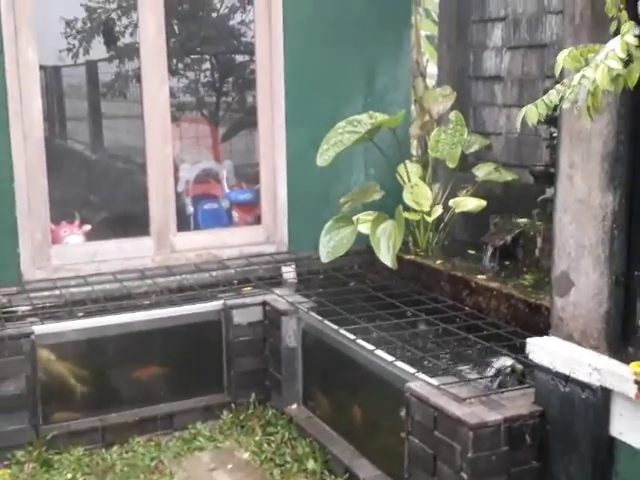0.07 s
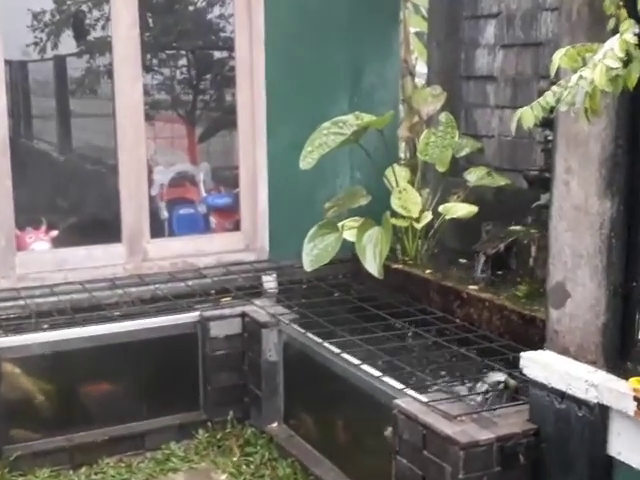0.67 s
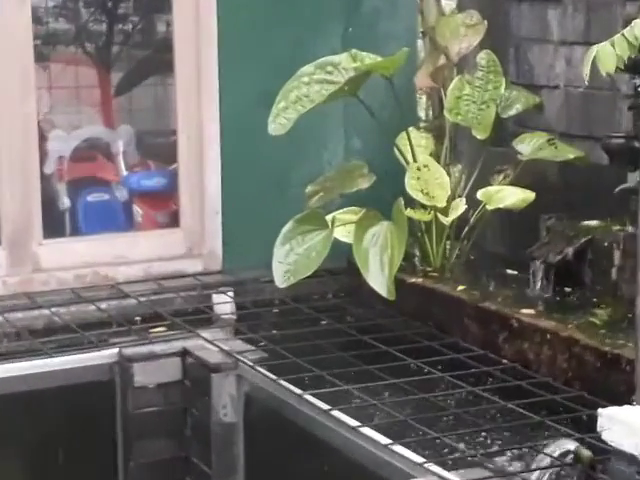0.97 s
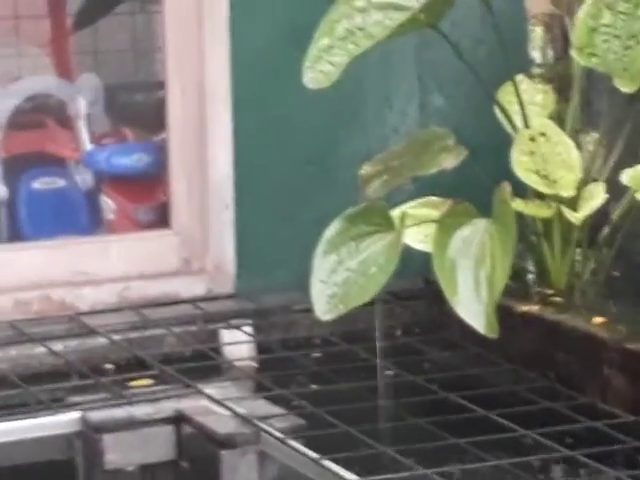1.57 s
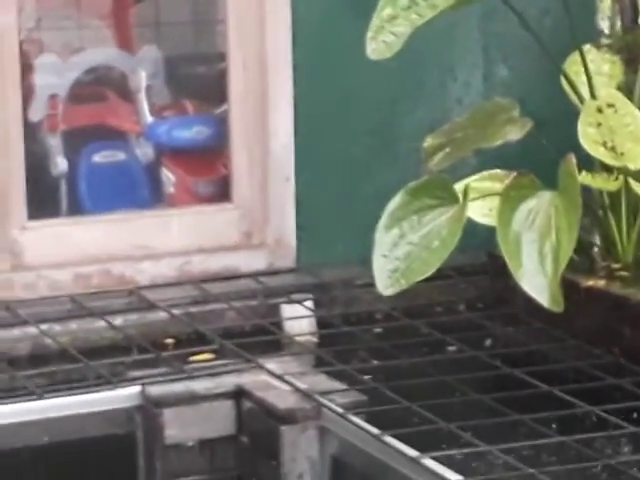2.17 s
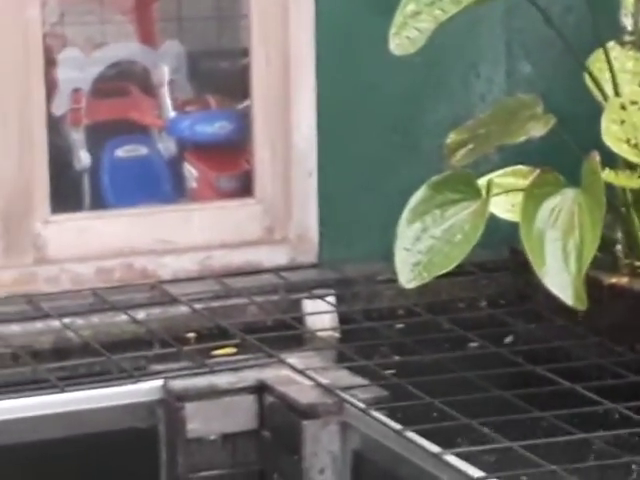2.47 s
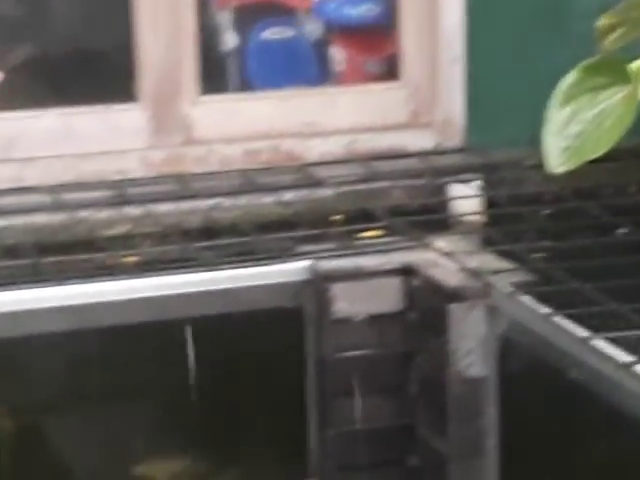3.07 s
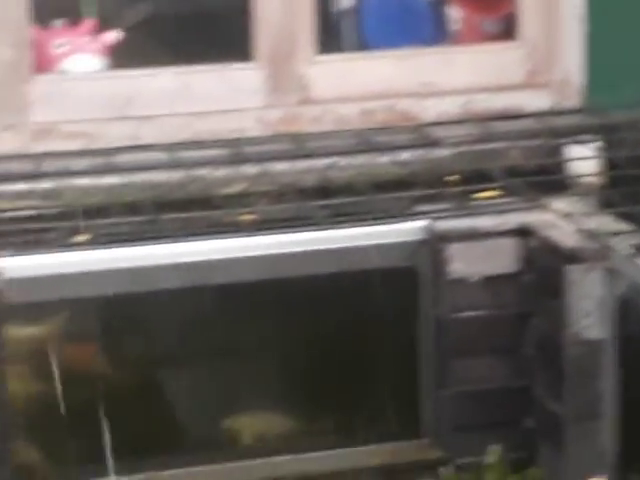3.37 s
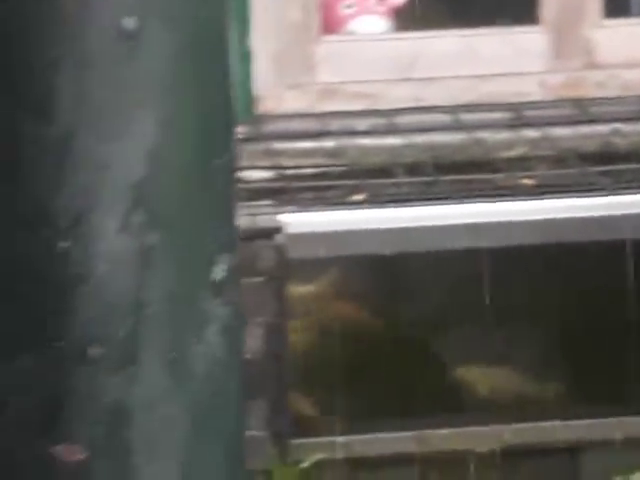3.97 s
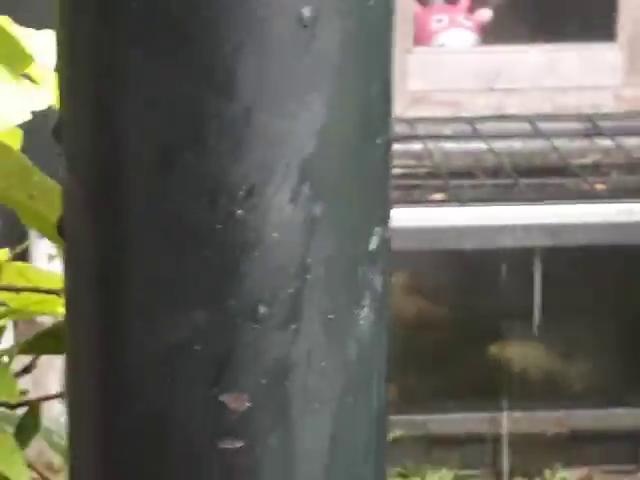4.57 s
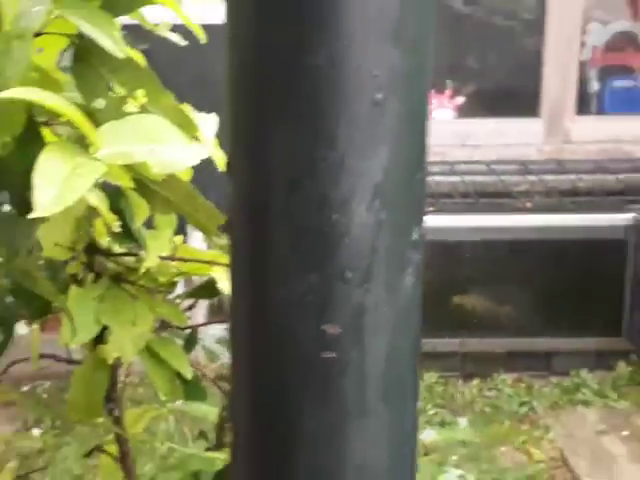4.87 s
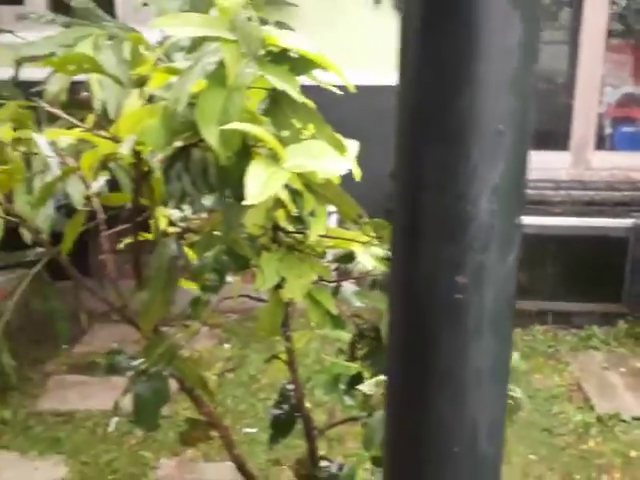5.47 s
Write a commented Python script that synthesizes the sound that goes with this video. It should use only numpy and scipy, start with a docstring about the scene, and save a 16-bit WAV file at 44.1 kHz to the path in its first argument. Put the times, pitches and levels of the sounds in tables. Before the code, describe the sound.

Rain patters thickly and continuously on plants, paving and pond water in a small garden, with a fine fizz of splashes on top. Now and then a heavy drop lands nearby with a crisp tick. Around halfway a faint rumble briefly rises, and the rain then softens a touch before partly recovering. One microphone hears it all, with the deepest and highest sounds dulled.

```python
"""Dense, steady rain patters on leaves, paving and a fish pond in a small walled garden.
Each drop is a tiny burst of tone. Countless far ones merge into a wash, splashes throw up a fizzing
spray, and single big drops tick close by. A soft rumble lies underneath and swells once near the middle.
One microphone hears it all and dulls the deepest and highest sounds."""
import sys
import numpy as np
from scipy.fft import rfft, irfft, next_fast_len
from scipy.io import wavfile
from scipy.ndimage import uniform_filter1d, minimum_filter1d, map_coordinates

SR = 44100
rng = np.random.default_rng(int(sys.argv[2]) if len(sys.argv) > 2 else 0)


def wrap_up_sound(samples):
    """Save the sound to the file named by the first command line argument, as 16-bit audio."""
    columns = np.atleast_2d(samples).T
    # keep every value between -1 and 1, then stretch to whole-number steps
    tamed = np.clip(columns, -1, 1)
    steps = np.round(tamed * 32767).astype(np.int16)
    wavfile.write(sys.argv[1], SR, steps)


N = 248283

# How strong a splash is from low to high pitch. Columns: pitch_hz, level_db
SPLASH_TONE = [(800, -33.5), (1800, -10.5), (2600, -5.5), (3300, -1.5), (3700, 0), (4300, 0), (4800, -4.5),
               (6000, -7), (9000, -10), (15000, -16)]


def amp(db):
    """Turn decibels into a number to multiply a sound by."""
    return 10 ** (np.asarray(db) / 20)


def unit(x):
    """Scale a sound so that its average strength (rms) is 1."""
    return x / np.sqrt(np.mean(x ** 2) + 1e-20)


def curves(rows):
    """Join a table's points with straight lines: one curve for each column after the time."""
    time_s, *columns = np.transpose(rows)
    return [np.interp(np.arange(N) / SR, time_s, column) for column in columns]


def wobble(rate_hz):
    """A smooth curve through rate_hz random values a second."""
    return map_coordinates(rng.standard_normal(2000), [np.arange(N) * rate_hz / SR], mode="wrap")


def coloured(x, tone):
    """Make each pitch louder or softer, following rows of (pitch_hz, level_db)."""
    size = next_fast_len(N + 8192, real=True)
    pitch_hz, level_db = np.transpose(tone)
    all_hz = np.fft.rfftfreq(size, 1 / SR)
    gain = amp(np.interp(np.log(all_hz + 1), np.log(pitch_hz), level_db))
    # these steps make the filter ring only after a hit, never before it
    cepstrum = irfft(np.log(gain), size)
    cepstrum[1:size // 2] *= 2
    cepstrum[size // 2 + 1:] = 0
    return irfft(rfft(x, size) * np.exp(rfft(cepstrum)), size)[:N]


def rush(tone):
    """Steady noise: too many hits to tell apart."""
    return unit(coloured(rng.standard_normal(N), tone))


def placed(start_s, sounds):
    """Add up short sounds, one a row, each starting at its own time."""
    at = np.round(np.abs(start_s) * SR).astype(int)[:, None] + np.arange(sounds.shape[1])
    return np.bincount(at.ravel(), sounds.ravel(), N)[:N]


def crackles(count, fade_s):
    """Short bursts of noise, equal in energy, that fall by 60 dB in fade_s."""
    t = np.arange(SR // 10) / SR
    bursts = rng.standard_normal((count, len(t))) * amp(-60 * t / fade_s)
    return bursts / np.linalg.norm(bursts, axis=1, keepdims=True)


def impacts(start_s, level_db, pitch_hz, rise_s, rough):
    """Each drop is a tone that swells and dies within milliseconds; splashing roughens it."""
    t = np.arange(SR // 100) / SR
    age = t / np.maximum(rise_s, 1 / SR)[:, None]  # 1 at the loudest moment
    loudness = amp(level_db)[:, None] * age * np.exp(1 - age)
    drift = np.cumsum(rng.standard_normal(age.shape), axis=1) * rough
    return placed(start_s, loudness * np.sin(2 * np.pi * pitch_hz[:, None] * t + drift))


def shower(count, centre_hz, scatter, cycles, spread_db):
    """Drops at random moments: many small ones, few large, each with its own pitch."""
    when, smallness, pitch, life = rng.random((count, 4)).T
    pitch_hz = centre_hz * np.exp(scatter * np.log(pitch / (1 - pitch)))
    pitch_hz = np.clip(pitch_hz, 200, SR / 3)
    level_db = -spread_db * np.log(smallness + .02)
    rise_s = cycles * (life + .5) / pitch_hz
    return unit(impacts(when * N / SR, level_db, pitch_hz, rise_s, rough=0.073))


def rumble():
    """A soft, wavering low roar under the rain that swells once."""
    # The deep tone of the roar. Columns: pitch_hz, level_db
    rumble_tone = [(25, -34), (45, -22), (62, -11.5), (78, -12), (100, -0.5), (125, -1), (170, 2.5),
                   (260, -2), (450, -6.5), (1000, -47.5)]
    rest_db, swell_db = -41.5, 9
    start_s, rise_s, hold_s, fall_s = 2.5, 0.4, 0.48, 0.54
    corners_s = np.cumsum([start_s, rise_s, hold_s, fall_s])
    swell = np.interp(np.arange(N) / SR, corners_s, [0, 1, 1, 0])
    return amp(rest_db + swell_db * swell + 1.9 * wobble(7)) * rush(rumble_tone)


def far_rain(wash_db):
    """Rain on lawn and roofs all around, with dull plops from the pond."""
    # The tone of countless far drops blended together. Columns: pitch_hz, level_db
    wash_tone = [(60, -47.5), (140, -17.5), (200, -3.5), (330, -0.5), (480, -0.5), (760, 0.54), (950, 0),
                 (1300, 0.5), (1900, -1.5), (3000, -3), (4500, -2.5), (7000, -18), (15000, -18)]
    hush = rush(wash_tone) * amp(0.46 * wobble(14))
    plops = shower(count=2200, centre_hz=983, scatter=0.271, cycles=1.57, spread_db=5)
    return amp(wash_db + 3.5) * hush + amp(wash_db - 11.5) * plops


def spray(spray_db):
    """Tiny droplets thrown up by splashes make a high fizz; the nearest spatter one by one."""
    # The thin hiss of the droplets. Columns: pitch_hz, level_db
    spray_tone = [(3000, -22), (6000, -7.5), (9000, 0), (12000, 2.5), (15500, 0)]
    fizz = shower(count=3000, centre_hz=10900, scatter=0.11, cycles=1.0, spread_db=3.5)
    spatter = shower(count=90, centre_hz=10500, scatter=0.12, cycles=1.3, spread_db=3.5)
    loudness = amp(spray_db + 23.5 + 0.73 * wobble(10))
    return loudness * (rush(spray_tone) + amp(-10) * fizz + amp(-13) * spatter)


def big_drops(start_s, ring_db, pitch_hz, snap_db):
    """A big drop snaps as it lands, rings for an instant, rebounds and scatters a little splash."""
    # The bright tone of the snap. Columns: pitch_hz, level_db
    snap_tone = [(600, -31), (1500, -16), (2300, 7.5), (6000, 1.5), (9000, 1), (15000, -8)]
    count = len(start_s)
    rise_s = 1.36 / pitch_hz  # the ring is loudest after 1.36 vibrations
    ring = impacts(start_s, ring_db - 3.5, pitch_hz, rise_s, rough=0.027)
    # water thrown off by the blow strikes again within a few milliseconds
    wait_s = 0.001066 + 0.0018 * rng.random(count)
    rebound = impacts(start_s + wait_s, ring_db - 8.0, pitch_hz, rise_s, rough=0.07)
    snaps = placed(start_s, amp(snap_db - 4.0)[:, None] * crackles(count, fade_s=0.0047))
    splashes = placed(start_s, amp(ring_db + 15.0)[:, None] * crackles(count, fade_s=0.13))
    return ring + rebound + coloured(snaps, snap_tone) + coloured(splashes, SPLASH_TONE)


def stray_drops(count):
    """Big drops a little further off fall at random, each with its own size, pitch and hardness."""
    centre_hz, scatter_octaves, range_db = 4030, 0.37, 7.5
    when, smallness, softness = rng.random((count, 3)).T
    pitch_hz = centre_hz * 2 ** (scatter_octaves * rng.standard_normal(count))
    ring_db = -8.5 - range_db * smallness
    snap_db = 6 - range_db * (smallness + softness)
    return big_drops(when * N / SR, ring_db, pitch_hz, snap_db)


def close_drops():
    """The few big drops that land nearest tick well above the rain."""
    # One drop a row; levels are relative. Columns: start_s, ring_db, pitch_hz, snap_db
    ticks = [(0.078, -1, 4570, 7), (0.1555, 1, 4600, -4), (0.213, -6.5, 3940, 2), (1.2408, -6, 4300, 0),
             (1.253, -7, 5200, 5), (1.3847, 0, 3900, 1), (1.405, -3, 3800, 6), (2.748, -4, 3450, -4),
             (2.8842, -3.5, 4100, -2), (3.237, 4, 3900, 10), (3.3417, -3, 4060, 4), (3.5, -8.5, 3440, 0),
             (3.785, -8, 4200, 11), (3.7963, -7.5, 3480, 0), (3.9971, -8, 4400, 9.5),
             (4.2299, -4.5, 3750, 1), (4.5153, -5, 3250, -2), (4.5912, -1.5, 3100, 5),
             (4.6444, -3, 3050, -1), (4.9817, -1.5, 4700, 14), (5.1013, -7, 3100, 4),
             (5.175, -4.5, 4400, 13), (5.4492, -5, 2900, 10)]
    return big_drops(*np.transpose(ticks))


def patter(patter_db):
    """Drops on leaves, paving and water: a dense sizzle, and nearer drops that stand out of it."""
    sizzle = rush(SPLASH_TONE) * amp(1.04 * wobble(22.08))
    dense = shower(count=5000, centre_hz=3913, scatter=0.1256, cycles=1.3, spread_db=2.5)
    near = shower(count=520, centre_hz=4000, scatter=0.128, cycles=1.17, spread_db=1.0)
    flurry = amp(patter_db + 0.63 * wobble(8.3))
    return flurry * (amp(-2.5) * sizzle + amp(-6.0) * dense + amp(-11.0) * near)


def scene():
    """All of the rain reaches one microphone, so left and right are the same."""
    # The rain builds slowly, eases all at once, then recovers a little; levels are relative.
    # Columns: time_s, wash_db, patter_db, spray_db
    rain_levels = [(0, -27, -24, -49.5), (0.9, -27.5, -23, -50.5), (1.3, -26, -23, -49),
                   (2.35, -27.5, -22.5, -49), (2.85, -26, -22, -47.5), (3.32, -27, -21, -46),
                   (3.42, -29, -24, -49.5), (3.7, -30, -24.5, -50), (4.4, -30.5, -25.5, -50.5),
                   (4.8, -28.5, -23, -48.3), (5.63, -29.7, -23.5, -49)]
    wash_db, patter_db, spray_db = curves(rain_levels)
    steady_rain = far_rain(wash_db) + patter(patter_db) + spray(spray_db)
    garden = steady_rain + close_drops() + stray_drops(count=40) + rumble()
    return np.array([garden, garden])


def limited(x, top=1.0):
    """Turn the volume down for an instant around any peak that would overload."""
    hold = SR // 500
    needed_gain = top / np.maximum(np.abs(x), top)
    return x * uniform_filter1d(minimum_filter1d(needed_gain, 2 * hold), hold)


def record(dry):
    """The microphone shapes the tone, loud peaks are held down and the highest pitches are cut off."""
    # The microphone weakens deep bass and pitches above 5 kHz, most at 9 kHz. Columns: pitch_hz, level_db
    mic_tone = [(20, -22), (35, -17), (60, -1), (4300, 0), (5000, 0.5), (6000, -4.5), (7000, -12),
                (8000, -22), (9000, -28), (10500, -21.5), (11700, -20), (14000, -22), (15800, -23)]
    top_hz = 15800
    heard = limited(np.array([coloured(channel, mic_tone) for channel in dry]))
    size = next_fast_len(N + 8192)
    below_top = np.fft.rfftfreq(size, 1 / SR) < top_hz
    return irfft(rfft(heard, size) * below_top, size)[:, :N]


dry = scene()
out = record(dry)
wrap_up_sound(out)
```